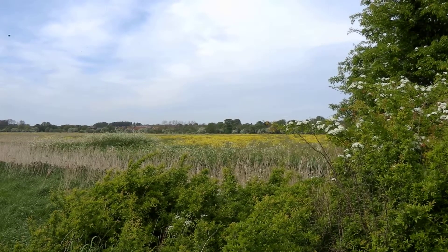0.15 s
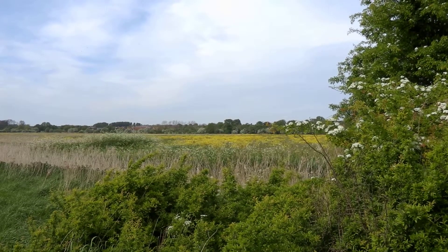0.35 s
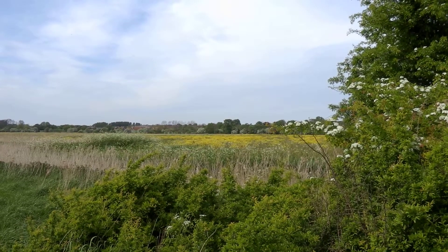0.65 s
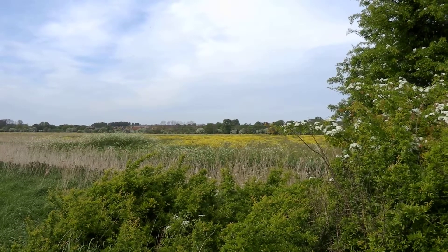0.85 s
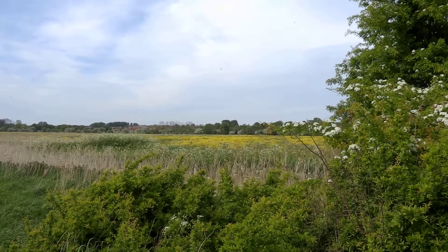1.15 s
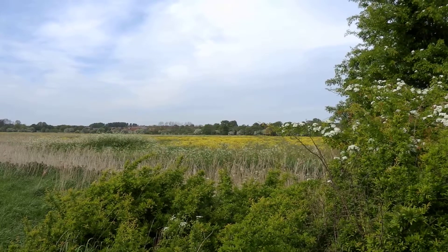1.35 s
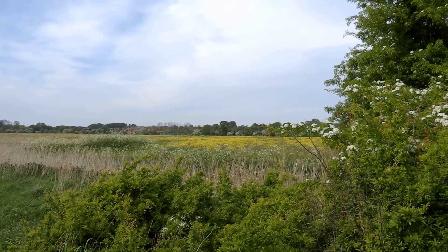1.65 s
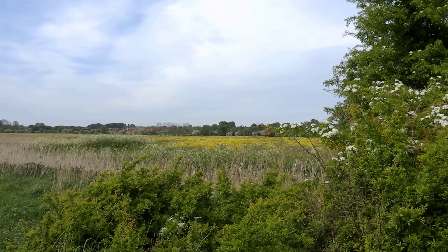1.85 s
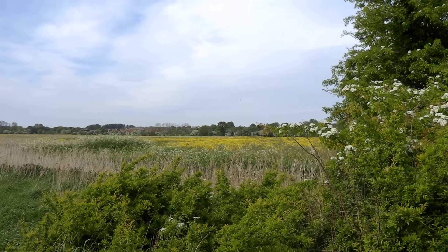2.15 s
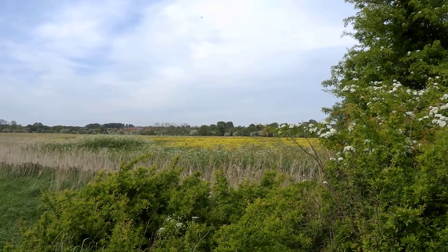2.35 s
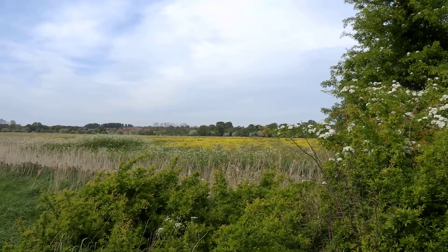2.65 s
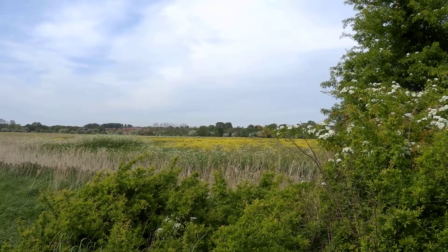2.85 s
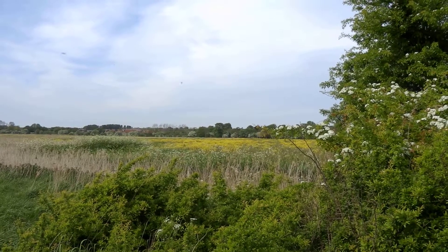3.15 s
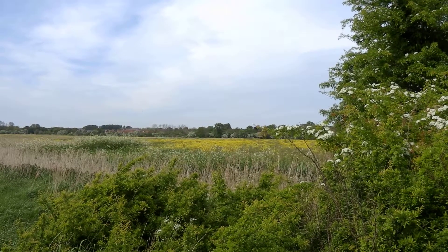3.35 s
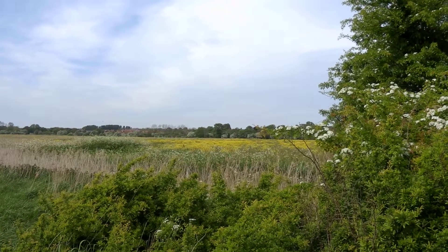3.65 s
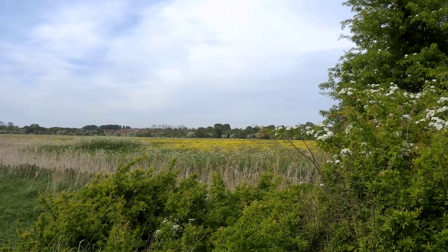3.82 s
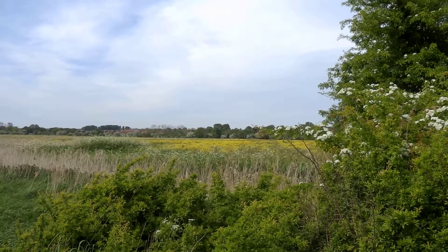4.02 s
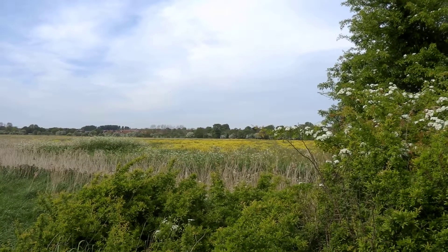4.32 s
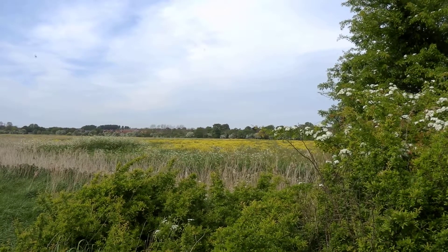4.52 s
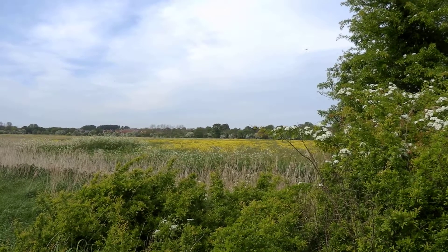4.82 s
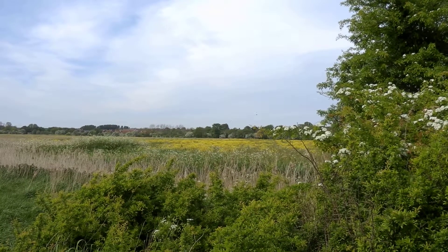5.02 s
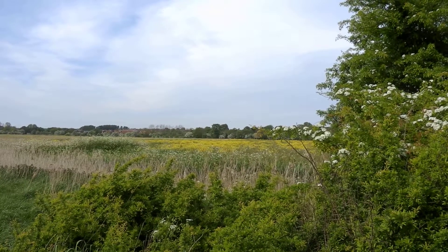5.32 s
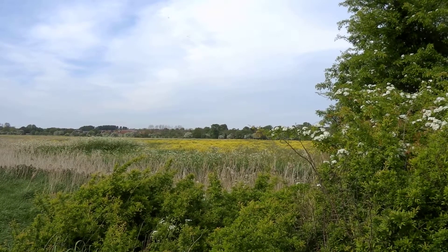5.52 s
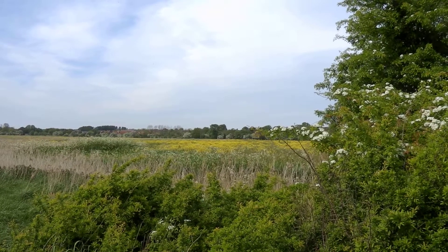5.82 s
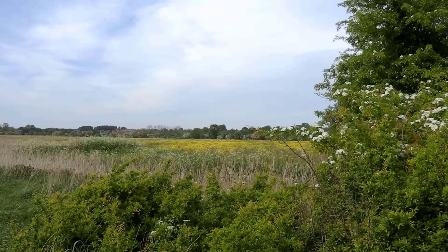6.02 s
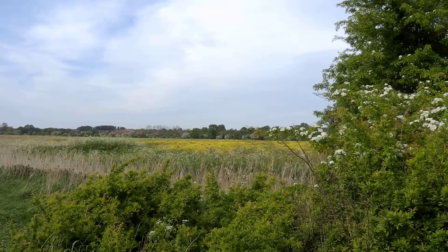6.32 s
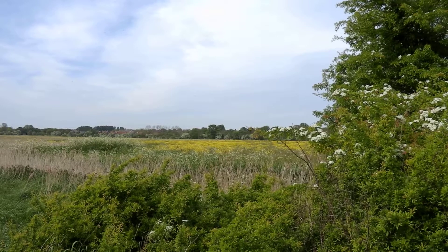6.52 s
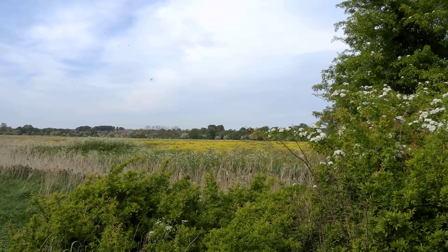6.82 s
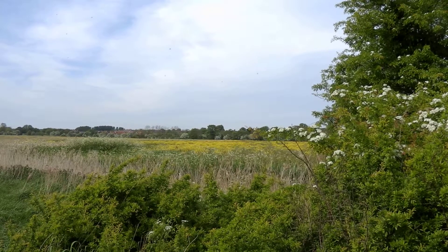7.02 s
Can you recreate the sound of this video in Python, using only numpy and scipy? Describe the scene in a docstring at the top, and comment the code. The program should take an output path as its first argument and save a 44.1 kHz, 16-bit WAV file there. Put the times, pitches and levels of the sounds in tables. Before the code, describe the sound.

A nightingale sings from a bush on the right: falling slurs, alternating low and sharp notes, a snap, then swelling whistles over low distant rumble.

```python
"""At the edge of a marsh, a nightingale sings in a bush: two falling slurs, four low rising notes with sharp peaked
notes between them, a snap, a few soft notes and, after a pause, a crescendo of whistles. Birds' notes are sines
that follow pitch curves; harsh ones gain unsteady side tones. Fainter birds chatter in the reeds, and foliage
scatters the song as fading noise. Shaped noise and low tones make distant engines under the microphone's hiss."""
import sys
import numpy as np
from scipy import signal
from scipy.fft import rfft, irfft, next_fast_len
from scipy.io import wavfile
from scipy.ndimage import map_coordinates

SR = 44100
rng = np.random.default_rng(int(sys.argv[2]) if len(sys.argv) > 2 else 0)


def to_wav(s):
    """Save 16-bit WAV."""
    ch = np.atleast_2d(s).T  # columns
    pcm = np.round(np.clip(ch, -1, 1) * 32767)  # PCM
    wavfile.write(sys.argv[1], SR, pcm.astype(np.int16))


N = 316197  # length in samples

# Colours of the background noises. Each row: frequency in Hz, relative level in dB per Hz.
RUMBLE = [(10, -14.5), (22, -5), (35, -1), (60, -0.5), (80, -6.5), (130, -32.5), (300, -74.5)]
TRAFFIC = [(40, -31.5), (90, -0.5), (120, 0.5), (170, -1.5), (250, -5.5), (400, -9), (600, -16),
           (800, -19.5), (1100, -28), (1500, -37), (3000, -48), (8000, -96.5)]
HISS = [(100, -8.5), (1500, -2), (2500, -3), (4000, -7.5), (8000, -6.5), (10500, -11.5), (12500, -10.5),
        (14500, -1), (15800, -0.5)]
# How alike those noises are left and right. Each row: frequency in Hz, likeness (1 is identical).
ALIKE = [(30, .8), (80, 0.84), (150, 0.7), (350, 0.68), (700, 0.65), (1500, 0.23), (4000, 0),
         (12000, 0.023)]
# The engine drone rising and falling. Each row: time in seconds, relative level in dB.
DRONE_LEVEL = [(0.1, -56), (1.64, -56), (2.85, -64), (5.67, -53), (5.91, -65), (6.16, -52), (7.1, -45)]
# How long the foliage scatter lasts. Each row: frequency in Hz, seconds to fade by 60 dB.
FOLIAGE = [(1500, 0.42), (3000, 0.29), (8000, 0.23)]

# Thin notes of distant birds.
# Each row: start in seconds, length in seconds, first Hz, last Hz, level in dB at the top of the throb.
TRILLS = [(0, .09, 2330, 2580, -64), (.226, .083, 3000, 3190, -59), (.373, .052, 4100, 4070, -64),
          (.45, .052, 2900, 2480, -64), (3.599, .03, 4500, 3850, -77), (3.708, .022, 4600, 3950, -77),
          (3.968, .38, 7350, 7500, -80), (4.019, .05, 5000, 5620, -76), (4.25, .19, 5400, 4950, -80),
          (4.4, .028, 4200, 3200, -77), (4.898, .17, 2980, 3850, -75), (5.098, .23, 4600, 4750, -76),
          (5.2, .025, 2560, 2400, -70), (6.24, .075, 5900, 4300, -75), (6.285, .16, 4350, 3950, -73)]
# Side tones of a rasping note. Each row: ratio to the note's pitch, level in dB against a fully rasping note.
RASP = [(.5, -6.5), (.75, -6), (.875, -5), (1.127, -8), (1.25, -5), (1.5, -9.5)]
# The warbler's calls, at their basic pitch. Each row is a note: seconds from the call's start,
# length in seconds, first Hz, middle Hz, last Hz, level in dB within the call, rasp from 0 to 1.
BUZZ = [(0, .066, 3200, 3720, 3700, 0, .62)]
SCOLD = [(0, .066, 3850, 3400, 2400, 0, .28)]
DOUBLE = [(0, .049, 3480, 3650, 2850, 0, .5), (.052, .044, 2800, 3500, 3380, -4, .4)]
STUTTER = [(0, .031, 3080, 3240, 3500, 0, .43), (.033, .036, 3270, 3220, 3160, 1, .38)]
CHURR = [(0, .022, 3300, 3500, 3900, 0, 1), (.018, .022, 3300, 3600, 4000, 1, 1),
         (.037, .022, 3300, 3600, 4000, 1, 1), (.055, .022, 3300, 3600, 3900, 0, 1)]
GRUNT = [(0, .035, 2320, 1900, 2000, 0, .5)]
# The warbler's song. Each row: call, start in seconds, pitch factor, level in dB.
WARBLER = [(GRUNT, 1.875, 1, -72), (GRUNT, 1.962, .97, -74), (BUZZ, 2.022, .82, -72),
           (CHURR, 2.133, 1.06, -77.5), (DOUBLE, 2.357, .96, -68), (BUZZ, 2.745, 1.01, -67),
           (SCOLD, 3.475, 1.02, -66.5), (SCOLD, 3.808, .96, -64), (STUTTER, 4.145, 1, -68.5),
           (GRUNT, 4.488, 1, -72.5), (BUZZ, 4.53, .97, -68), (DOUBLE, 5.801, 1, -63.5),
           (DOUBLE, 6.112, 1, -65)]
# The warbler's rattles. Each row: start in seconds, level of the first upsweep in dB.
RATTLES = [(3.141, -70), (6.499, -66)]

# Note shapes at their basic length and pitch.
# Each row: seconds from the note's start, pitch in Hz, level in dB within the note.
SLUR = [(0, 6620, -15), (.004, 6400, -17), (.03, 4940, -19), (.047, 4100, -24), (.062, 3600, -18.5),
        (.083, 3440, -10.5), (.096, 3230, -3), (.122, 3016, -2), (.13, 2870, -21)]
LISP = [(0, 7600, -20), (.016, 8030, -10), (.025, 7670, 1), (.033, 7200, -1.5), (.041, 6670, -3.5),
        (.046, 6200, -25)]
RISE = [(0, 1680, -15.5), (.015, 1732, -13), (.032, 1828, -3.5), (.045, 2075, 1.5), (.056, 2260, 1.5),
        (.066, 2311, -5), (.074, 2300, -26)]
PEAK = [(0, 2810, -17), (.008, 3050, -2), (.018, 3343, -8), (.026, 3760, 6.5), (.029, 3973, -7.5),
        (.034, 3575, 1.5), (.042, 2950, 0), (.051, 2530, -1), (.057, 2310, -21)]
DROP = [(0, 4770, -19), (.012, 4580, -3), (.028, 3820, 2), (.048, 3400, -2), (.068, 3180, -5.5),
        (.08, 3150, -13)]
ARCH = [(0, 2550, -12), (.024, 2860, -1), (.044, 3300, -11), (.062, 3700, -2.5), (.084, 3080, -9),
        (.106, 2800, -9.5), (.135, 2700, -15)]
HOOK = [(0, 1980, -15), (.018, 2417, -4), (.07, 2517, -1.5), (.078, 3750, -2.5), (.086, 2120, 7.5)]
SIGH = [(0, 4310, 0), (.005, 2990, 0), (.014, 2500, -1), (.05, 2220, -13), (.095, 2120, -17)]
# Soft notes of a bird farther off on the same side.
# Each row: shape, start in seconds, length factor, pitch factor, level in dB.
SOFT = [(SIGH, 3.53, 1, 1.02, -70), (SIGH, 3.862, 1, 1.05, -71), (HOOK, 4.768, 1, 0.97, -66.5),
        (HOOK, 5.073, 1, 0.99, -64.5), (SIGH, 5.234, 1, 0.93, -68.5), (SIGH, 5.539, 1.05, 0.98, -63.5)]
# The quiet notes that close the nightingale's phrase.
# Each row: shape, start in seconds, length factor, pitch factor, relative level in dB.
CLOSE = [(DROP, 1.571, 1, 1, -56), (ARCH, 1.739, 1, 1.015, -54)]
# A snap and the chips around it, before colouring.
# Each row: start in seconds, length in seconds, first Hz, middle Hz, last Hz, level in dB, rasp from 0 to 1.
SNAP = [(1.258, 0.032, 5140, 4860, 4440, -54, 0.1), (1.283, 0.013, 8870, 7120, 5800, -46.5, 0.64),
        (1.284, .014, 4480, 2285, 1300, -62, 0.57), (1.345, 0.022, 6240, 6170, 6040, -56, 0.06),
        (1.457, 0.0346, 3050, 2564, 2490, -55.5, 0)]
# The snap's colour. Each row: frequency in Hz, gain in dB.
SNAP_COLOUR = [(2000, 0), (4000, -2), (5800, -1.5), (8000, -5), (9500, -23), (11000, -18), (14000, -28)]
# Short ticks, the first on the snap. Each row: start in seconds, starting level in dB before colouring.
TICKS = [(1.284, -46), (6.425, -63), (6.49, -60), (6.521, -58), (6.777, -54), (6.842, -54)]
# The ticks' colour. Each row: frequency in Hz, gain in dB.
TICK_COLOUR = [(1000, -10), (2500, 0), (5500, 0), (8500, -11), (15000, -14)]
# The crescendo. Each row: start in seconds, length in seconds, first Hz, middle Hz, last Hz,
# rise of the closing flick in Hz, relative peak level in dB, eagerness (above 1 it swells early).
WHISTLES = [(5.370, .138, 2580, 2520, 2525, 0, -44.5, .75), (5.702, .146, 2535, 2520, 2480, 130, -42, .85),
            (6.028, .150, 2595, 2485, 2430, 70, -40.5, 1.5),
            (6.350, .180, 2455, 2492, 2505, 0, -34.8, 1.35),
            (6.690, .170, 2520, 2492, 2390, 50, -34.3, 1.55),
            (7.008, .175, 2590, 2492, 2440, 0, -34.2, 1.8)]
# The nightingale's main notes.
# Each row: shape, start in seconds, length factor, pitch factor, relative level in dB.
SONG = [(LISP, .028, 0.99, 0.99, -42), (SLUR, 0.038, 1, 0.98, -37), (LISP, 0.275, 0.97, 1, -41),
        (SLUR, 0.288, 1.047, .97, -35.5), (RISE, 0.5073, .85, 1, -44.5), (PEAK, 0.6128, 1, 0.99, -35.5),
        (RISE, 0.7143, 0.95, 1, -43), (PEAK, .827, 1.04, 0.97, -36), (RISE, .931, 0.97, .99, -44.5),
        (PEAK, 1.044, 1, 0.99, -35), (RISE, 1.157, 0.93, 0.99, -42)]

TOP_HZ = 15800  # nothing is kept from here up
RUMBLE_DB, RUMBLE_SWAY_DB, RUMBLE_SWAYS_PER_S = -54.8, 1.2, 5
EARLY_GLIDE = .75  # share of a thin note's glide that is done by its middle
# A rattle's chirp: length, (first, middle, last) pitch, level against the first upsweep.
CHIRP_S, CHIRP_HZ, CHIRP_DB = .05, (2380, 2620, 2690), -1
# Its upsweeps: length, (first, middle, last) pitch, rasp; then their timing and the fade per sweep.
SWEEP_S, SWEEP_HZ, SWEEP_RASP = .017, (2050, 3550, 4500), .5
SWEEP_AFTER_S, SWEEP_EVERY_S, SWEEP_FADE_DB = .053, .037, 2.3
UPPER_RATIO, UPPER_DB = 1.5, -5  # the upper voice of chirps and hooked notes
SWELL_DB, SWELL_SHARE = 30, .8  # a whistle grows by this much over this share of its length
FLICK_S = .03  # some whistles turn up in pitch over this last stretch


def amp(db):
    """Turn decibels into a gain."""
    return 10 ** (np.asarray(db) / 20)


def unit(x):
    """Scale a sound to an average strength (rms) of 1."""
    return x / np.sqrt(np.mean(x ** 2) + 1e-20)


def along(points, hz):
    """Read a curve of (Hz, value) points, with frequency on a log axis."""
    f, v = np.transpose(points)
    return np.interp(np.log(hz + 1), np.log(f + 1), v)


def wobble(rate, size):
    """A smooth random curve through a set number of random points per second."""
    points = rng.standard_normal(int(size * rate / SR) + 4)
    return map_coordinates(points, [np.arange(size) * rate / SR])


def filtered(x, response):
    """Change each frequency of a sound by a response, which may also shift its timing."""
    m = next_fast_len(N + SR // 2)
    return irfft(rfft(x, m) * response(np.fft.rfftfreq(m, 1 / SR)), m)[..., :N]


def add(track, s, sound):
    """Mix a sound into a track from time s in seconds."""
    part = track[max(round(s * SR), 0):][:len(sound)]
    part += sound[:len(part)]


def tone(hz):
    """A sine of rms 1 that follows a pitch curve, by adding up its phase."""
    return np.sqrt(2) * np.sin(2 * np.pi * np.cumsum(hz) / SR)


def rush(spectrum):
    """Stereo noise of rms 1: a shared middle and an opposed side, so the bass is more alike in both ears."""
    def middle_and_side(hz):
        turn = np.arccos(np.clip(along(ALIKE, hz), -1, 1)) / 2
        return amp(along(spectrum, hz)) * [np.cos(turn), np.sin(turn)]

    mid, side = filtered(rng.standard_normal((2, N)), middle_and_side)
    return unit(np.array([mid + side, mid - side]))


def distance():
    """Far traffic and a swaying wind rumble, with an engine's low drone and a whine that slowly grows."""
    t = np.arange(N) / SR
    rumble_db = RUMBLE_DB + RUMBLE_SWAY_DB * wobble(RUMBLE_SWAYS_PER_S, N)
    rumble = amp(rumble_db) * rush(RUMBLE)
    traffic = amp(-55.5) * rush(TRAFFIC)
    unsteady_drone = tone(82.5 * (1 + 0.018 * wobble(12, N))) * amp(2.0 * wobble(9, N))
    drone_db = np.interp(t, *np.transpose(DRONE_LEVEL)) - 1.0
    drone = amp(drone_db) * unit(unsteady_drone)
    whine_db = np.interp(t, [1, 4, 7], [-76, -66, -60])
    whine = tone(385 * (1 + 0.0041 * wobble(10, N))) * amp(whine_db)
    return rumble + traffic + drone + whine


def placed(x, right_db, right_lead_ms, wet_db):
    """Sounds set between left and right by level and by timing, followed by scatter from leaves and reeds."""
    side = np.array([[-.5], [.5]])  # left and right each take half the difference
    direct = filtered(x, lambda hz: amp(side * right_db) * np.exp(2j * np.pi * hz * side * right_lead_ms / 10 ** 3))
    # the scatter is noise whose frequencies fade at different speeds
    hz, t, z = signal.stft(rng.standard_normal((2, SR // 2)), SR, nperseg=256)
    fade_db = -60 * t / along(FOLIAGE, hz)[:, None]
    tail = signal.istft(z * amp(fade_db), SR, nperseg=256)[1]
    scatter = signal.fftconvolve(x[None], tail / np.linalg.norm(tail[0]), axes=1)[:, :N]
    return direct + amp(wet_db + side * right_db / 2) * scatter


def bend(length, first, middle, last):
    """A pitch curve through three points, and a rounded swell of the same length."""
    u = np.linspace(0, 1, int(length * SR))
    hz = np.polyval(np.polyfit([0, .5, 1], [first, middle, last], 2), u)
    swell = np.abs(np.sin(np.pi * u)) ** 0.46
    return hz, swell


def trills(rate_hz=52, depth=.015, throb_db=4.0, jitter=0.016):
    """Thin distant notes whose pitch and level shake together."""
    track = np.zeros(N)
    for s, length, first, last, db in TRILLS:
        middle = first + EARLY_GLIDE * (last - first)
        hz, swell = bend(length, first, middle, last)
        turn = 2 * np.pi * rate_hz * np.arange(len(hz)) / SR
        shake = 1 + depth * np.cos(turn) + jitter * wobble(700, len(hz))
        throb = amp(db - throb_db + throb_db * np.sin(turn))
        add(track, s, throb * swell * tone(hz * shake))
    return track


def rasps(notes, jitter, flutter):
    """Harsh notes: the vibration turns irregular and throws side tones around its pitch."""
    track = np.zeros(N)
    for s, length, first, middle, last, db, rasp in notes:
        hz, swell = bend(length, first, middle, last)
        hz = hz * (1 + jitter * rasp * wobble(1200, len(hz)))
        sides = np.zeros(len(hz))
        for ratio, level in RASP:
            sides += amp(level) * tone(ratio * hz) * (1 + flutter * wobble(400, len(hz)))
        add(track, s, amp(db) * swell * (tone(hz) + rasp * sides))
    return track


def chatter():
    """The warbler's notes: a few stock calls, each repeated at its own pitch and strength."""
    notes = []
    for call, s, pitch, db in WARBLER:
        for after, length, first, middle, last, note_db, rasp in call:
            notes.append((s + after, length, pitch * first, pitch * middle, pitch * last, db + note_db, rasp))
    return notes


def rattles(chirp_rasp=.15, count=3):
    """The notes of each rattle: a chirp in two voices, then evenly spaced upsweeps that fade."""
    notes = []
    upper_hz = UPPER_RATIO * np.array(CHIRP_HZ)
    for s, db in RATTLES:
        chirp_db = db + CHIRP_DB
        notes.append((s, CHIRP_S, *CHIRP_HZ, chirp_db, chirp_rasp))
        notes.append((s, CHIRP_S, *upper_hz, chirp_db + UPPER_DB, chirp_rasp))
        for k in range(count):
            start = s + SWEEP_AFTER_S + k * SWEEP_EVERY_S
            notes.append((start, SWEEP_S, *SWEEP_HZ, db - k * SWEEP_FADE_DB, SWEEP_RASP))
    return notes


def syrinx(rows, second_db, third_db, jitter, edge=0.0022, fuzz=0):
    """A bird's voice: a nearly pure note along (s, Hz, dB) rows, with two overtones that fuzz can roughen."""
    s, hz, db = np.transpose(rows)
    t = np.arange(s[0], s[-1], 1 / SR)
    pitch = np.interp(t, s, hz) * (1 + jitter * wobble(120, len(t)))
    # a soft start and end, each lasting edge seconds
    gate = np.sin(np.pi / 2 * np.clip(np.minimum(t - s[0], s[-1] - t) / edge, 0, 1)) ** 2
    rough = pitch * (1 + fuzz * wobble(2200, len(t)))
    overtones = amp(second_db) * tone(2 * rough) + amp(third_db) * tone(3 * rough)
    return gate * amp(np.interp(t, s, db)) * (tone(pitch) + overtones)


def phrase(notes, second_db, third_db, jitter, fuzz, pulse_hz=135, pulsed_for=0.043, forced_db=9):
    """Notes from shapes; peaked ones are forced and brighter, rising ones start as pulses that merge."""
    track = np.zeros(N)
    for shape, s, stretch, pitch, db in notes:
        bright_db = forced_db * (shape == PEAK)
        rows = np.array(shape) * [stretch, pitch, 1]
        note = syrinx(rows, second_db + bright_db, third_db + bright_db, jitter, fuzz=fuzz)
        if shape == RISE:
            t = np.arange(len(note)) / SR
            merging = np.exp(-(t / pulsed_for) ** 2)
            note = note * (1 - merging * np.cos(2 * np.pi * pulse_hz * t))
        add(track, s, amp(db) * note)
    return track


def soft_notes():
    """The farther bird's hooks and sighs; the held part of a hook carries an upper voice."""
    track = phrase(SOFT, second_db=-8, third_db=-25, jitter=0.0043, fuzz=.003)
    for shape, s, stretch, pitch, db in SOFT:
        if shape == HOOK:
            held = np.array(HOOK[:3]) * [stretch, pitch * UPPER_RATIO, 1]
            upper = syrinx(held, second_db=-30, third_db=-40, jitter=.005)
            add(track, s, amp(db + UPPER_DB) * upper)
    return track


def ticks(t60=.008):
    """Short bursts of noise that fade by 60 dB in t60 seconds."""
    track = np.zeros(N)
    t = np.arange(SR // 20) / SR
    for s, db in TICKS:
        add(track, s, amp(db - 60 * t / t60) * rng.standard_normal(len(t)))
    return filtered(track, lambda hz: amp(along(TICK_COLOUR, hz)))


def twigs(x, spread=.012, echo_db=-19, count=6):
    """Near branches return weak copies within milliseconds, so gliding notes ripple in level."""
    out = x.copy()
    for delay in rng.uniform(.1, 1, count) * spread:
        add(out, delay, amp(echo_db) * x)
    return out


def whistles(release=0.014, waver_db=1.1, jitter=.006):
    """Long whistles, each bending a little as it swells, and louder than the last."""
    track = np.zeros(N)
    for s, length, first, middle, last, flick, db, eagerness in WHISTLES:
        hz, _ = bend(length, first, middle, last)
        t = np.arange(len(hz)) / SR
        closing = np.clip(1 - (length - t) / FLICK_S, 0, 1)
        hz = hz * (1 + jitter * wobble(60, len(t))) + flick * closing
        still_to_grow = np.clip(1 - t / (SWELL_SHARE * length), 0, 1) ** eagerness
        level = db - SWELL_DB * still_to_grow
        note = syrinx(np.transpose([t, hz, level]), second_db=-41, third_db=-55.5, jitter=.0035)
        fade = np.sin(np.pi / 2 * np.clip((length - t[:len(note)]) / release, 0, 1)) ** 2
        add(track, s, note * fade * amp(waver_db * wobble(70, len(note))))
    return track


def scene():
    """The nightingale on the right, the reed birds near the middle, the far rumble and hiss all round."""
    background = distance() + amp(-71.5) * rush(HISS)
    reed_notes = rasps(chatter() + rattles(), jitter=0.031, flutter=0.72) + trills()
    reeds = placed(reed_notes, right_db=1.5, right_lead_ms=-0.048, wet_db=-6.5)
    neighbour = placed(soft_notes(), right_db=4, right_lead_ms=0.071, wet_db=-7.5)
    # the snap, ticks and quiet closing notes carry more scatter than the song
    snap = filtered(rasps(SNAP, jitter=0.16, flutter=1.0), lambda hz: amp(along(SNAP_COLOUR, hz)))
    last_notes = twigs(phrase(CLOSE, second_db=-29, third_db=-45, jitter=.015, fuzz=.04))
    close = placed(snap + ticks() + amp(-2) * last_notes, right_db=4.5, right_lead_ms=0.11, wet_db=-4)
    crescendo = placed(amp(-.5) * whistles(), right_db=4.1, right_lead_ms=.085, wet_db=-17.5)
    song = twigs(phrase(SONG, second_db=-40, third_db=-47, jitter=0.0058, fuzz=.06))
    nightingale = placed(amp(-2.0) * song, right_db=6, right_lead_ms=0.088, wet_db=-9)
    return background + reeds + neighbour + close + crescendo + nightingale


def record(dry):
    """The microphone's sound keeps nothing at or above its band limit."""
    return filtered(dry, lambda hz: hz < TOP_HZ)


dry = scene()
out = record(dry)
to_wav(out)
```